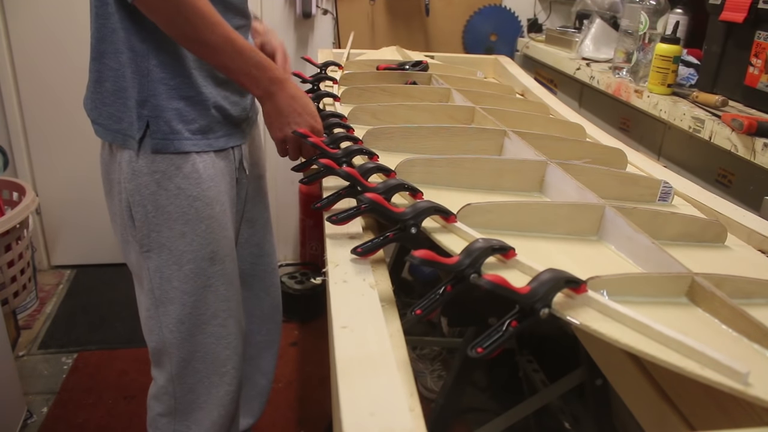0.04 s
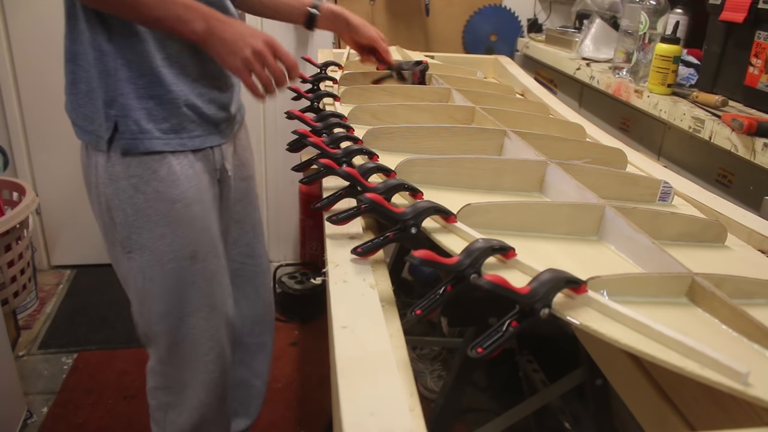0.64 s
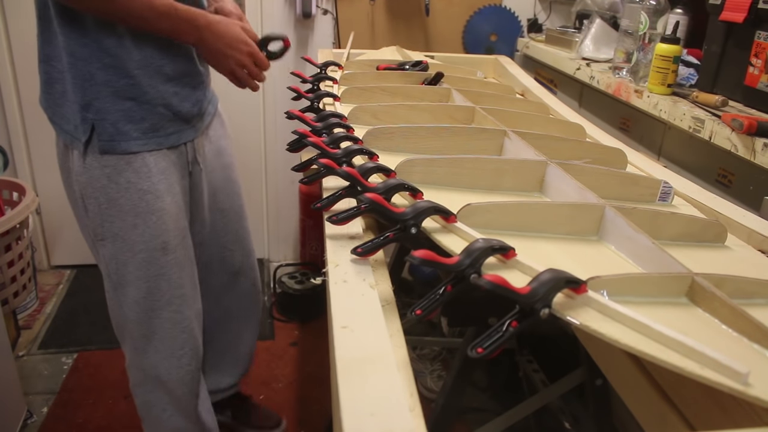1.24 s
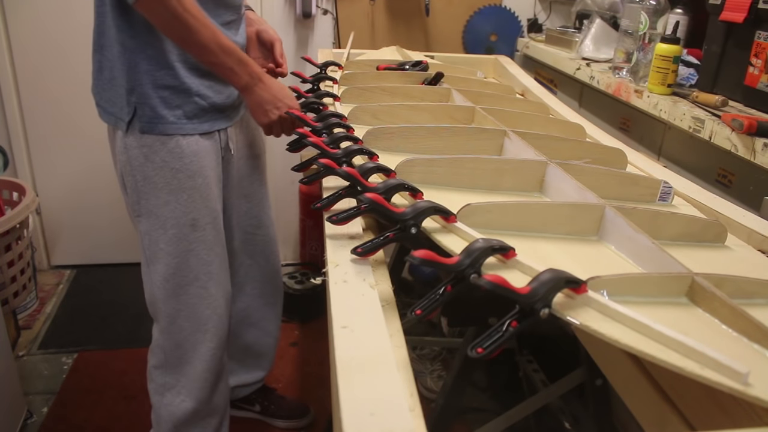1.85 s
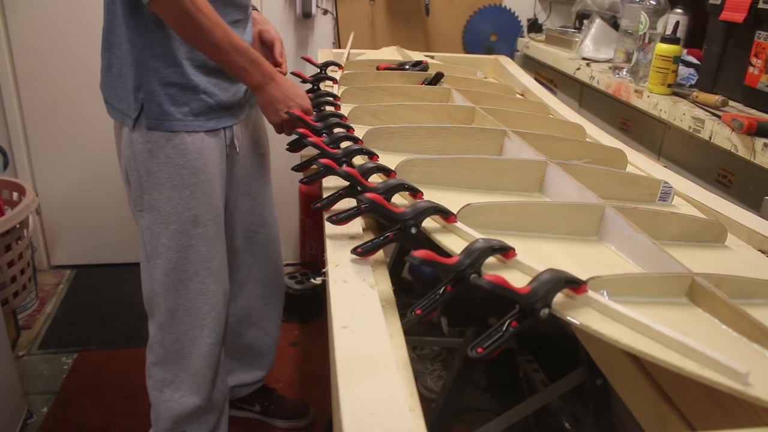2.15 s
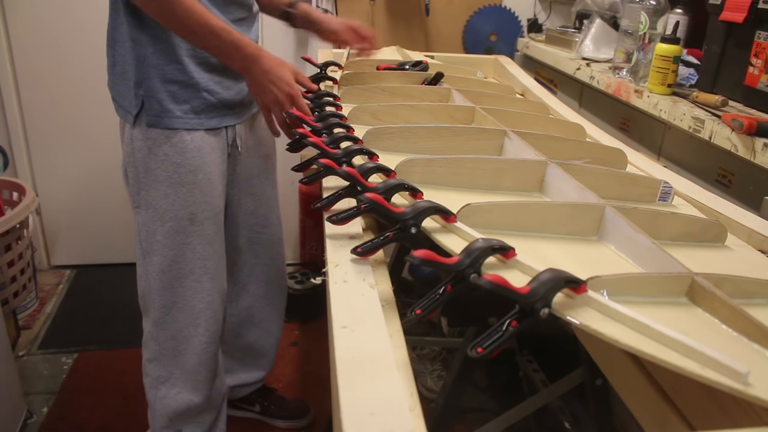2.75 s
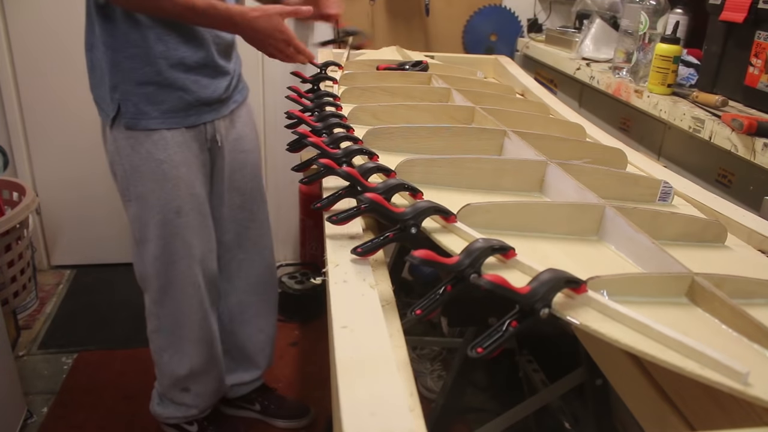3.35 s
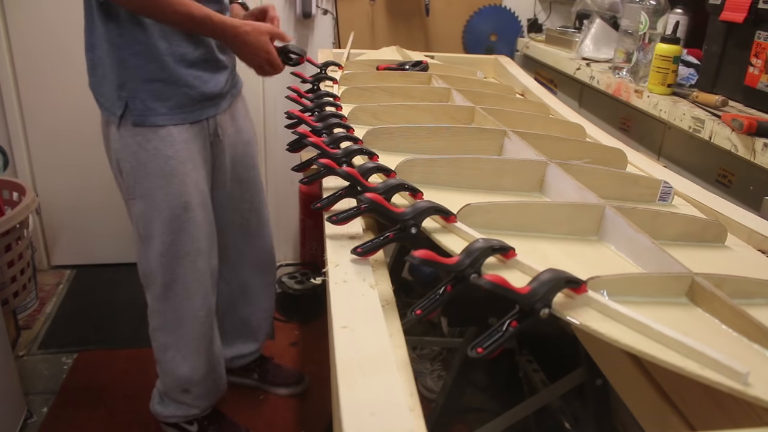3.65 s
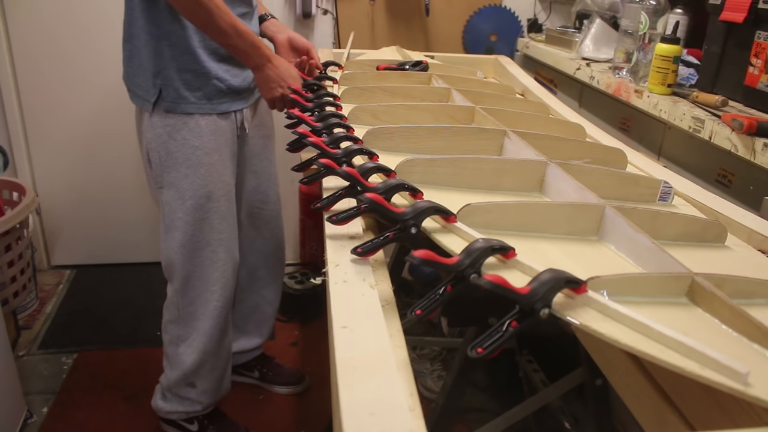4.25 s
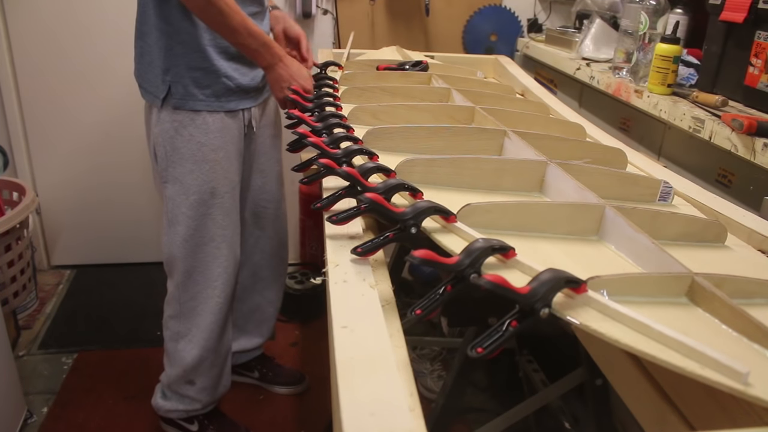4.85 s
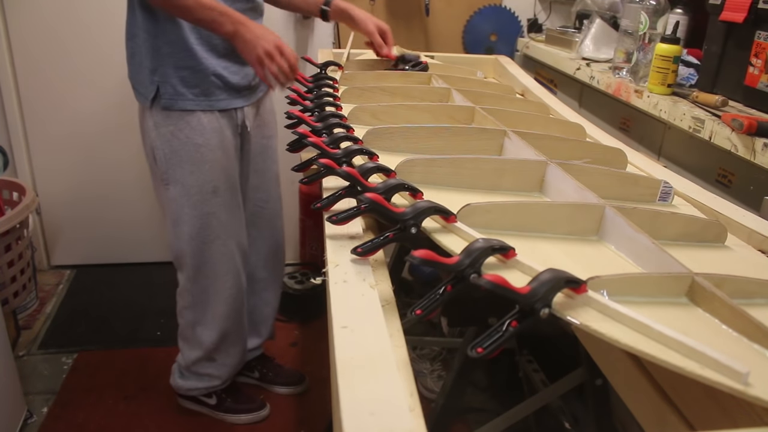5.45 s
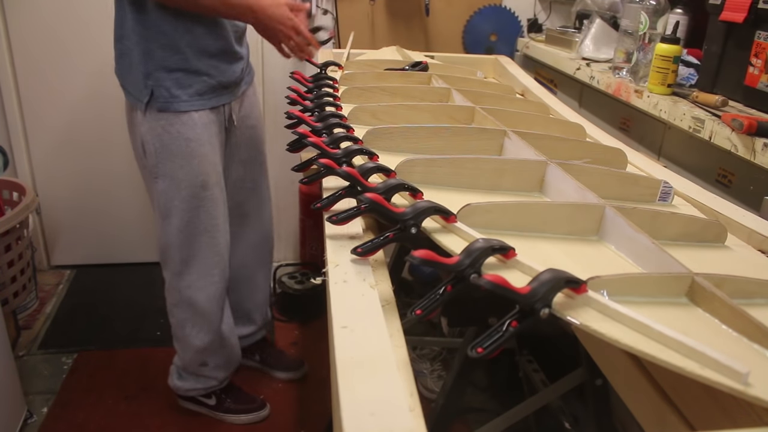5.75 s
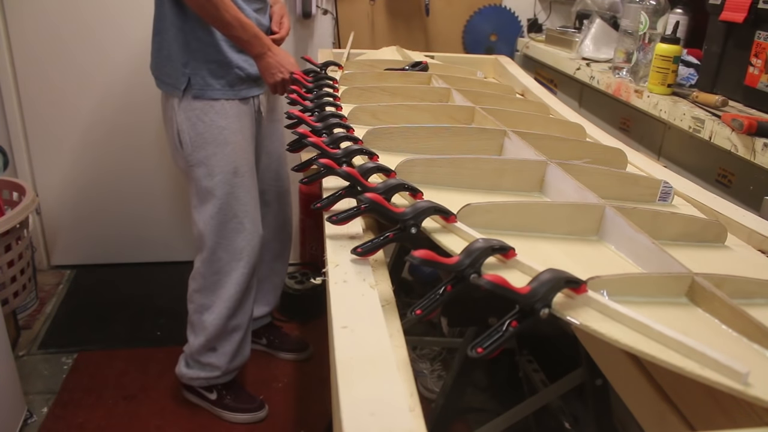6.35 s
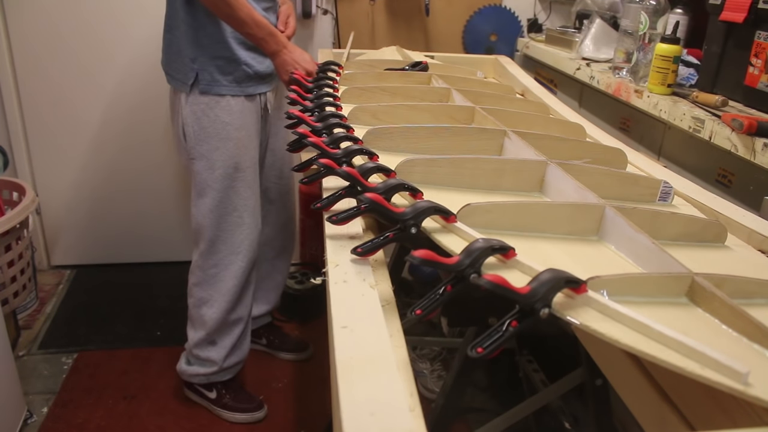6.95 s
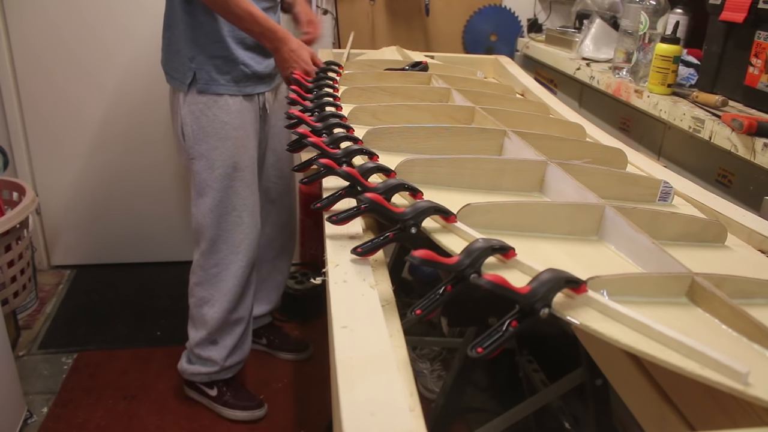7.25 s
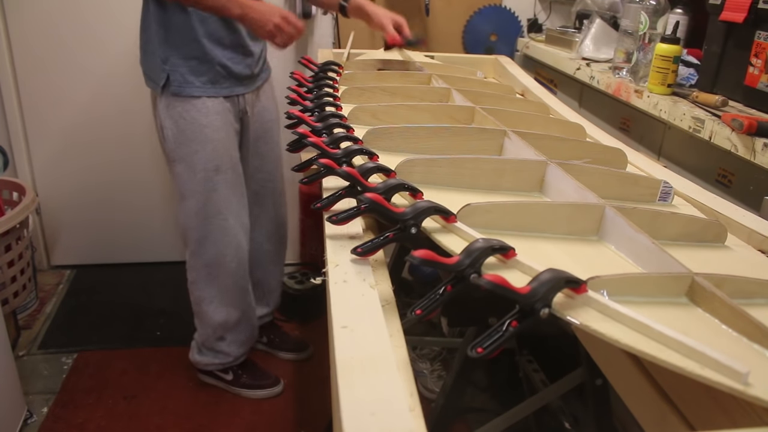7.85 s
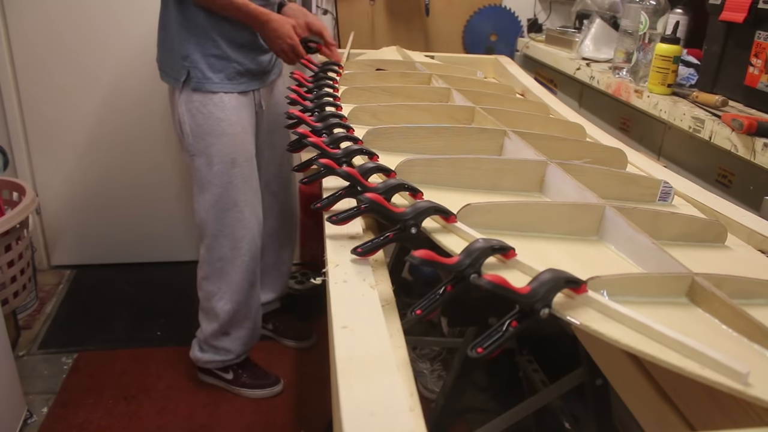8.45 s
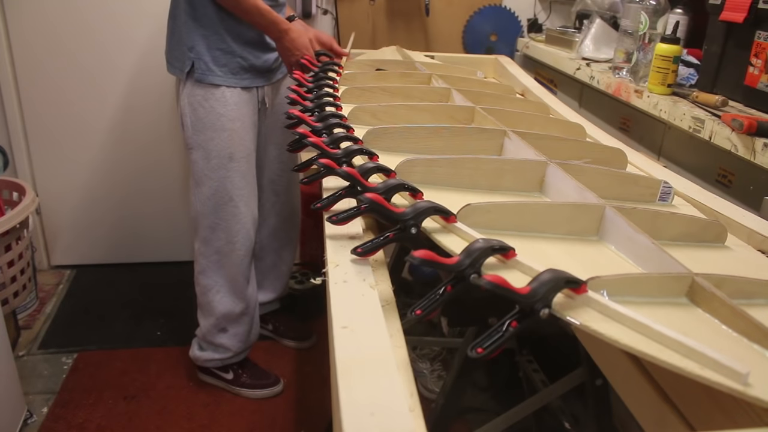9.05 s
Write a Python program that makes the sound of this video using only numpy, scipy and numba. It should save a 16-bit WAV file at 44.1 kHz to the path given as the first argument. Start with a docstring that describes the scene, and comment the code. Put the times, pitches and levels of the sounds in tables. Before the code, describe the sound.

Plastic spring clamps are picked up, dragged and set on a hollow wooden frame in a small workshop, heard close. A loud clatter comes near the start, then scattered light knocks, ticks and short scrapes, another clatter past the middle and the loudest near the end. Each contact rings the thin boards briefly. Behind are quiet room hiss and a very faint distant vehicle.

```python
"""Spring clamps on a hollow wooden frame

A small workshop, heard from two close microphones. Plastic spring clamps are picked off the frame,
dragged across it and set on its rim. Each knock and scrape rings the thin boards and the clamp, then
dies away in the room. A vehicle drones far outside; a limiter ducks after the loudest clatters."""
import sys
import numpy as np
from scipy import signal
from scipy.fft import rfft, irfft, next_fast_len
from scipy.io import wavfile
from numba import njit

SR = 44100
rng = np.random.default_rng(int(sys.argv[2]) if len(sys.argv) > 2 else 0)


def unload_audio(sound):
    """Save the sound as a 16-bit wav file, at the path given as the first command line argument."""
    columns = np.transpose(np.atleast_2d(sound))
    # keep every value between -1 and 1, then stretch to whole-number steps
    steps = np.round(np.clip(columns, -1, 1) * 32767)
    wavfile.write(sys.argv[1], SR, steps.astype(np.int16))


N = 405279
BANDS_HZ = 30 * 2 ** (np.arange(19) / 2)
ATTACK_SAMPLES = int(.03 * SR)  # the first 30 ms of a contact set its level


def undb(db):
    """Decibels to gain."""
    return 10 ** (np.asarray(db) / 20)


def rms(x):
    """Root mean square along time."""
    return np.sqrt(np.mean(x ** 2, axis=-1, keepdims=True))


def at(points, hz):
    """Read (Hz, value) points on a log-frequency axis."""
    f, value = np.transpose(points)
    return np.interp(np.log(hz), np.log(f), value)


def decay(t, t60):
    """Fall by 60 dB in t60 seconds; several t60s give a row each."""
    return np.exp(-np.log(1000) * t / np.asarray(t60)[..., None])


def add(out, start_s, sound):
    """Mix a sound in at its start time."""
    i = max(int(start_s * SR), 0)
    out[:, i:i + sound.shape[1]] += sound[:, :N - i]


def wander(turns_per_s):
    """Slow random drift with a spread near 1."""
    knots = rng.standard_normal(int(N / SR * turns_per_s) + 2)
    return np.interp(np.arange(N) / SR * turns_per_s, np.arange(len(knots)), knots)


def band_noise(size):
    """Unit noise in overlapping half-octave bands: (mid and side, band, time)."""
    hz = np.arange(size // 2 + 1) * SR / size + 1
    shape = np.cos(np.pi / 2 * np.clip(2 * np.log2(hz / BANDS_HZ[:, None]), -1, 1))
    white = rng.standard_normal((2, len(BANDS_HZ), size))
    noise = irfft(rfft(white) * shape, size)
    return noise / rms(noise)


def steady_noise(spectrum, width):
    """Mid and side noise of a given spectrum and width, mid at rms 1."""
    size = next_fast_len(N)
    hz = np.arange(size // 2 + 1) * SR / size + 1
    gain = undb(at(spectrum, hz)) * np.array([np.ones(len(hz)), undb(at(width, hz))])
    noise = irfft(rfft(rng.standard_normal((2, size))) * gain, size)[:, :N]
    return noise / rms(noise[0])


# The quiet workshop. Each row: frequency in Hz, relative noise density in dB.
ROOM_TONE_SPECTRUM = [(15, -38.5), (25, -12.5), (54, -2.5), (151, -8), (182, -7), (213, -5.5), (301, -7.5),
                      (425, -9), (460, -10.5), (511, -7.5), (569, -10), (4600, -21), (11000, -26),
                      (14000, -31.5)]
# Width of the background at the microphones. Each row: frequency in Hz, side minus mid in dB.
AMBIENCE_WIDTH = [(60, -16), (300, -7.5), (1000, -5), (3000, 0), (10000, 0)]


def room_tone(noise_db=-57, hum_hz=100, hum_db=-69):
    """Room air and microphone hiss all round, with a faint mains hum in the centre."""
    out = undb(noise_db) * steady_noise(ROOM_TONE_SPECTRUM, AMBIENCE_WIDTH)
    out[0] += undb(hum_db) * np.sqrt(2) * np.sin(2 * np.pi * hum_hz * np.arange(N) / SR)
    return out


# A far engine changes up a gear, then eases off. Each row: time in seconds, pitch in Hz, level in dB.
ENGINE_COURSE = [(0, 62.6, -59), (0.601, 69.7, -68), (1.9, 70.8, -59), (2.2, 54, -63), (2.999, 54.4, -59),
                 (4.1, 50.5, -63), (4.3, 50, -86)]
# Road noise from indoors. Each row: frequency in Hz, relative noise density in dB.
ROAD_SPECTRUM = [(30, -29), (55, 4), (130, -4.5), (250, -5.5), (500, -16.5), (1000, -7), (1600, -34.5),
                 (3000, -42)]


def distant_vehicle(road_db=-53.5, nearest_s=1.98, passing_s=0.91, engine_trim_db=1, waver_db=2):
    """A wavering engine note comes dully through the walls; the road noise falls with distance."""
    t = np.arange(N) / SR
    times, *columns = np.transpose(ENGINE_COURSE)
    engine_hz, engine_db = (np.interp(t, times, column) for column in columns)
    distance = np.hypot(1, (t - nearest_s) / passing_s)  # 1 at the nearest point
    out = steady_noise(ROAD_SPECTRUM, AMBIENCE_WIDTH) * undb(road_db + wander(3.9)) / distance
    phase = 2 * np.pi * np.cumsum(engine_hz * (1 + 0.036 * wander(3.5))) / SR
    out[0] += np.sqrt(2) * np.sin(phase) * undb(engine_db + engine_trim_db + waver_db * wander(6.96))
    return out


def soft_bump(start_s=6.068, hz=207, db=-38, rise_s=0.025, t60=0.29):
    """One low bump swells and rings briefly, dead centre."""
    out, t = np.zeros((2, N)), np.arange(SR // 2) / SR
    envelope = (1 - np.exp(-t / rise_s)) * decay(t, t60)
    add(out[:1], start_s, undb(db) * (envelope * np.sin(2 * np.pi * hz * t))[None])
    return out


def ring_modes(modes, colour, t, scatter_db=4.0, detune=0.0062, rise_s=0.0063):
    """Decaying modes; each point of contact favours other ones."""
    hz, db, t60 = np.transpose(modes)
    polarity, strength, tuning = rng.standard_normal((3, len(hz)))
    gain = np.sign(polarity) * undb(db + at(colour, hz) + scatter_db * strength)
    waves = np.sin(2 * np.pi * np.outer(hz * (1 + detune * tuning), t)) * decay(t, t60)
    return gain @ waves * (1 - np.exp(-t / rise_s))


def contact_envelope(t, tick_db, t60, direct=0.93, bloom_s=0.0053, crack_db=-1, room_db=-10):
    """Each band's course in time: a crack and ring-down up close, the room's tail behind."""
    softness_db = min(tick_db, 0)
    # reflections from ribs, bench and walls swell the onset, most of all after a soft contact
    onset = np.clip(direct * undb(.2 * softness_db), 0, 1)
    bloom = 1 - (1 - onset) * np.exp(-t / bloom_s)
    crack = undb(crack_db + softness_db) * np.exp(-t / 0.00041)
    near = bloom * decay(t, t60) + crack
    room_t60 = at([(500, 0.35), (6000, 0.26)], BANDS_HZ)
    room = bloom * undb(room_db) * decay(t, room_t60)
    # bending waves need a few cycles to fill the boards, so the lows come late
    build = 1 - np.exp(-np.outer(BANDS_HZ + 200, t) / 3)
    return build * np.sqrt(near ** 2 + room ** 2)


# The hollow frame from close by. Each row: frequency in Hz, relative density in dB.
FRAME_SPECTRUM = [(35, -38.5), (80, -23), (125, -24), (180, -9), (260, -4.5), (420, -1.5), (620, 3.5),
                  (900, -2.5), (1300, -10.5), (2000, -16), (3200, -18.5), (4800, -32), (6500, -36),
                  (10000, -46.5), (14000, -60.5)]
# Its width in the room at the two microphones. Each row: frequency in Hz, side minus mid in dB.
FRAME_WIDTH = [(120, -28.5), (500, -14), (1000, -9.5), (2000, -6), (4000, -2), (8000, 0)]


def dense_ring(noise, envelope, colour, clamp_hz, ring_db, dense_db=-5.5, hump_octaves=0.24):
    """Modes too close to tell apart ring as bands of noise and crowd around the clamp's pitch."""
    size = envelope.shape[-1]
    start = rng.integers(noise.shape[-1] - size)
    bands = noise[..., start:start + size] * envelope
    share = undb(at(FRAME_SPECTRUM, BANDS_HZ)) * np.sqrt(BANDS_HZ)
    share /= np.linalg.norm(share)
    hump = np.exp(-(np.log2(BANDS_HZ / clamp_hz) / hump_octaves) ** 2)
    band_db = dense_db + at(colour, BANDS_HZ) + (3 + ring_db / 2) * hump
    unit_attack = rms(envelope) / rms(envelope[:, :ATTACK_SAMPLES]) / rms(bands)
    gain = share * undb(band_db) * unit_attack[..., 0]
    gain[1] *= undb(at(FRAME_WIDTH, BANDS_HZ))
    return np.einsum("cb,cbt->ct", gain, bands)


# Tone of a contact. In order, in Hz: thump, both ends of the unchanged middle, clack, tick.
TONE_POINTS_HZ = [230, 430, 800, 1500, 6000]
# The thin boards. Each row: frequency in Hz, relative level in dB, t60 in seconds.
BOARD_MODES = [(148.6, -20.5, .4), (187.6, -14, 0.16), (236.7, -16.5, 0.65), (279.4, -11, 0.47),
               (385, -5.5, 0.26), (424.6, -9.5, 0.33), (518, -13, 0.35), (573, 4, 0.19), (667, -10, 0.36),
               (802, -8.5, 0.17), (899, -6.5, .22), (1003.4, -2, 0.13), (1263, -14, 0.14),
               (1308, -11.5, 0.14), (1499, -13.5, 0.12), (1835, -23.5, 0.38)]
# The clamp's steel spring. Each row: frequency in Hz, relative level in dB, t60 in seconds.
STEEL_MODES = [(2330, -39.5, 0.17), (2320, -36.5, 0.13), (2750, -30.5, 0.15), (3470, -50, 0.078),
               (3780, -31.5, .12), (4550, -48.5, 0.22), (4700, -35.5, 0.11)]
# A plastic part's cluster and overtone. Each row: multiple of its pitch, relative level in dB.
PLASTIC_PARTIALS = [(0.957, -4), (0.998, -4), (1.044, -5.5), (2.15, -22)]


def contact(noise, tone_db, resonance, t60, frame_db=-3, board_db=3, **onset):
    """One contact rings boards, plastic and spring; mid and side at the close microphones."""
    t = np.arange(SR // 2) / SR
    thump, clack, tick = tone_db
    board_hz, clamp_hz, ring_db = resonance
    colour = list(zip(TONE_POINTS_HZ, [thump, 0, 0, clack, tick]))
    out = dense_ring(noise, contact_envelope(t, tick, t60, **onset), colour, clamp_hz, ring_db)
    # the struck board and the plastic each stand out with a pitch of their own
    struck = [(board_hz, board_db, 0.17)]
    struck += [(clamp_hz * ratio, ring_db + db - 15, 0.12) for ratio, db in PLASTIC_PARTIALS]
    out[0] += ring_modes(struck, colour, t, scatter_db=3.5, detune=0.0047, rise_s=0.0022)
    # a heavy thump deepens the dull thud without making the boards' low tones ring louder
    board_colour = list(zip(TONE_POINTS_HZ, [min(thump, 0), 0, 0, clack, tick]))
    out[0] += undb(frame_db) * ring_modes(BOARD_MODES, board_colour, t)
    out[0] += undb(ring_db / 2) * ring_modes(STEEL_MODES, colour, t)
    return out


# A clamp ticks in the hand. Each row: start in seconds, then level, clack and tick in dB.
HAND_TICKS = [(1.43, -61, 21.5, 25), (2.396, -63.5, -10, 44), (2.954, -58.5, 22, 17)]


def clamp_ticks(noise, thump_db=4, body_hz=905, clamp_hz=2950, t60=0.23):
    """Faint, thin clicks of plastic on plastic."""
    out = np.zeros((2, N))
    for start, db, clack, tick in HAND_TICKS:
        add(out, start, undb(db) * contact(noise, (thump_db, clack, tick), (body_hz, clamp_hz, 0), t60))
    return out


# Fingers nudge a clamp on the frame. Each row: start in seconds, then level, thump and tick in dB.
FINGER_NUDGES = [(0.224, -32.5, 2, -8), (0.265, -36.5, 2, -8), (0.505, -33, 0, 13), (2.614, -41.5, -6, -6),
                 (2.645, -36.5, 2, -7.5), (4.829, -35.5, -2, -17), (4.991, -49, 1, -42),
                 (5.148, -43.5, -8, -14), (5.191, -38.5, 3, -3), (6.6, -37.5, -14, 11.5),
                 (6.743, -47, 11, -7), (6.781, -37, -4, 5), (6.967, -47, 17, 16), (7.3, -41.5, -24, -3),
                 (7.358, -39.5, -3, -1), (7.708, -39, 10, -10), (7.742, -28.5, 3, 3.5),
                 (8.926, -45.5, 15.5, 2)]


def clamp_nudges(noise, board_hz=595, clamp_hz=1680, pitch_spread=0.013, t60=.2):
    """Light touches swell softly, each on a slightly different spot; more tick brings more clack."""
    out = np.zeros((2, N))
    spots = 1 + pitch_spread * rng.standard_normal((len(FINGER_NUDGES), 2))
    for (start, db, thump, tick), spot in zip(FINGER_NUDGES, spots):
        resonance = (board_hz * spot[0], clamp_hz * spot[1], 0)
        tone = (thump, 2.5 + 0.17 * tick, tick)
        sound = contact(noise, tone, resonance, t60, board_db=1, bloom_s=0.015, direct=.45)
        add(out, start, undb(db) * sound)
    return out


# Where a clamp meets the wood. Each row: pitch in Hz, ring strength in dB, t60 in seconds, part.
CLAMP_PARTS = [(1100, -4, 0.2, "heel"), (1272, 13.5, 0.23, "jaw"), (1200, -1, 0.3, "flank"),
               (1576, 22, 0.33, "pad"), (1834, 3.5, 0.11, "hinge"), (2230, 3, .33, "spring"),
               (2400, -6.5, 0.15, "handle"), (3360, -2, 0.22, "tip")]


def part_ring(part):
    """The part that makes contact sets the clamp's pitch, its ring and a knock's ring-down."""
    return next(row[:3] for row in CLAMP_PARTS if row[3] == part)


# A clamp slides over wood or rubs in the hand, close by. Each row: start and end in seconds,
# level, thump and tick in dB, board pitch in Hz, clamp part.
CLAMP_SLIDES = [(0.521, 0.549, -33, 0, 7.5, 600, "handle"), (0.576, 0.657, -25, 2, 9, 440, "tip"),
                (0.771, 0.813, -27, 4, -26, 414, "heel"), (2.017, 2.12, -30.5, -1, -11, 662, "flank"),
                (2.278, 2.355, -44, -3, -2.5, 667, "spring"), (2.453, 2.58, -51, 4, -7, 650, "flank"),
                (3.048, 3.072, -39.5, 13.5, -7, 443, "flank"), (4.109, 4.143, -41.5, 1, -12, 810, "heel"),
                (4.41, 4.546, -35, -4, 3.5, 608, "jaw"), (4.553, 4.72, -45, -3, 3, 586, "handle"),
                (4.695, 4.765, -38, 1, 4, 586, "flank"), (5.474, 5.514, -22.5, 2, 3, 577, "spring"),
                (5.522, 5.562, -30.5, -20, 16.5, 730, "tip"), (6.378, 6.433, -48, 11, 8.5, 328, "heel"),
                (6.79, 6.849, -39, -1, -5, 569, "spring"), (7.014, 7.072, -46, -3, -1, 575, "handle"),
                (7.942, 8.027, -10, 5, -12.5, 480, "heel"), (8.569, 8.63, -40, 3.5, 15.5, 322, "handle"),
                (8.728, 8.778, -55.5, 3, 21, 590, "handle")]


def clamp_scrapes(noise, slips_per_s=900, spread_db=3, t60=0.065):
    """Jaws catch and slip in a dense, uneven run of tiny blows; board tones are quieter than in a knock."""
    out = np.zeros((2, N))
    for start, end, db, thump, tick, board_hz, part in CLAMP_SLIDES:
        size = int((end - start) * SR)
        caught = rng.random(SR // 4) < slips_per_s / SR
        force = undb(spread_db * rng.standard_normal(SR // 4)) * rng.choice([-1, 1], SR // 4)
        slips = (caught * force)[:size] * signal.windows.tukey(size, .1)
        clamp_hz, ring_db, _ = part_ring(part)
        tone = (thump, 4 + 0.24 * tick, tick)  # harder slips clack more
        one_slip = contact(noise, tone, (board_hz, clamp_hz, ring_db), t60, board_db=0, frame_db=-6)
        slide = signal.fftconvolve(slips[None], one_slip, axes=1)
        # the whole slide is held as loud as the attack of a single contact
        gain = rms(one_slip[0, :ATTACK_SAMPLES]) / (rms(slide[0, :size]) + 1e-9)
        add(out, start, undb(db) * gain * slide)
    return out


# Clatter on the frame, right at the microphones. Each row: start in seconds,
# level, thump, clack and tick in dB, board pitch in Hz, clamp part.
CLAMP_KNOCKS = [(0.559, -17.5, 3, 6, -20, 572, "heel"), (0.602, -14.5, -8, -6, -2.5, 598, "handle"),
                (0.684, -16.5, -4, -5.5, 10, 519, "tip"), (0.748, -14.5, 5.5, 0, -10, 560, "heel"),
                (0.846, -10.5, -5.5, 7, -12.5, 645, "hinge"), (0.884, -15.5, -25, -25, -18.5, 669, "heel"),
                (1.95, -34, -5.5, -2, 5, 630, "flank"), (1.964, -28, -17, 10, 3, 663, "flank"),
                (1.984, -31, -8, 12.5, 5.5, 587, "flank"), (3.134, -26, -10, -11.5, -1.5, 610, "pad"),
                (3.177, -35.5, 4, 1, 11.5, 617, "pad"), (4.299, -22, -2.5, 3, 3.5, 877, "jaw"),
                (5.366, -21, 1, 10, -6.5, 583, "flank"), (5.412, -15, -4.5, -2, -4, 772, "spring"),
                (5.47, -22.5, 1, 3.5, 0, 577, "hinge"), (5.55, -30, -12, 9.5, 2, 728, "tip"),
                (7.075, -29, 2, -4.5, 17.5, 625, "handle"), (7.778, -14.5, -5, 1.5, -3.5, 601, "hinge"),
                (7.822, -9.5, -11, 6.5, 5.5, 840, "hinge"), (7.868, -11, -12, 7, -2.5, 595.6, "handle"),
                (7.907, -5, 6, 9.5, 1, 582, "handle"), (7.961, -19, -1, 15.5, -2, 597, "flank"),
                (8.059, -18, -8, 4, -3, 790, "handle")]


def clamp_knocks(noise):
    """A clamp knocks on the boards or snaps shut on them; the spot it hits gives the board's pitch."""
    out = np.zeros((2, N))
    for start, db, thump, clack, tick, board_hz, part in CLAMP_KNOCKS:
        clamp_hz, ring_db, t60 = part_ring(part)
        resonance = (board_hz, clamp_hz, ring_db)
        sound = contact(noise, (thump, clack, tick), resonance, t60, bloom_s=.004, direct=0.95, crack_db=1)
        add(out, start, undb(db) * sound)
    return out


def scene(clamps_db=-1, left_db=0.16):
    """Clamps up close, workshop and road behind, as left and right leaning slightly left."""
    noise = band_noise(size=65536)
    clamps = clamp_knocks(noise) + clamp_nudges(noise) + clamp_ticks(noise) + clamp_scrapes(noise)
    mid, side = undb(clamps_db) * clamps + soft_bump() + distant_vehicle() + room_tone()
    return np.array([(mid + side) * undb(left_db), (mid - side) * undb(-left_db)])


@njit
def follow_peaks(x, attack, release):
    """Envelope that rises fast and sinks slowly."""
    out, level = np.empty(len(x)), 0.
    for i in range(len(x)):
        level += (x[i] - level) * (attack if x[i] > level else release)
        out[i] = level
    return out


def record(dry, limit_db=-10, attack_s=0.0043, release_s=0.29, top_hz=13900):
    """The camera's limiter turns both microphones down after loud peaks; the top treble is cut."""
    envelope = follow_peaks(np.abs(dry).max(axis=0), 1 / (attack_s * SR), 1 / (release_s * SR))
    reduction = np.maximum(envelope / undb(limit_db), 1)
    limited = np.clip(dry / reduction, -1, 1)
    return signal.sosfilt(signal.ellip(10, .2, 70, top_hz, fs=SR, output="sos"), limited)


dry = scene()
out = record(dry)
unload_audio(out)
```